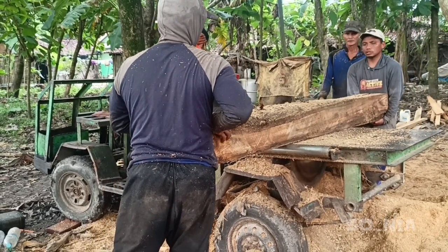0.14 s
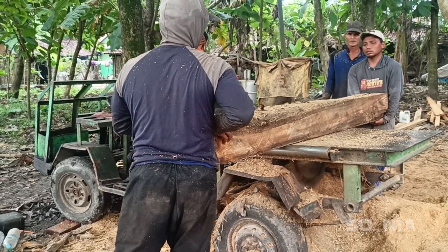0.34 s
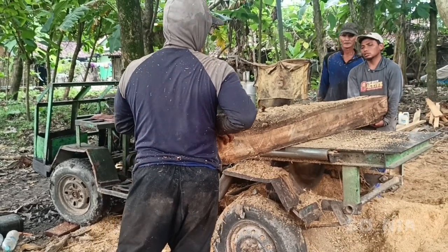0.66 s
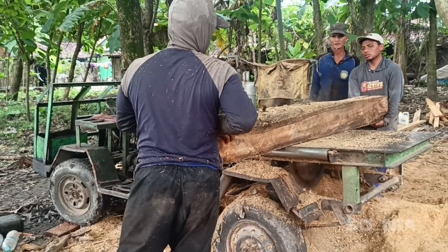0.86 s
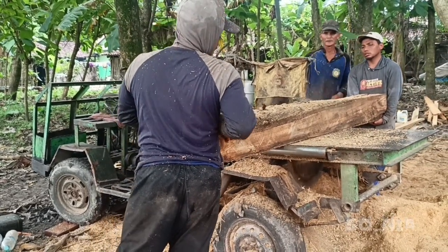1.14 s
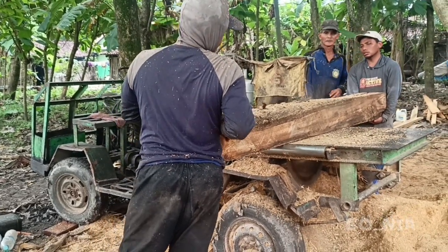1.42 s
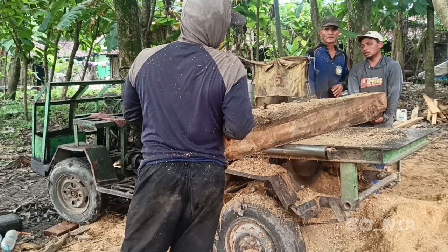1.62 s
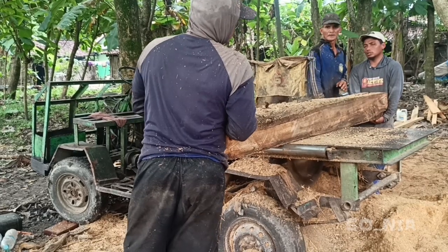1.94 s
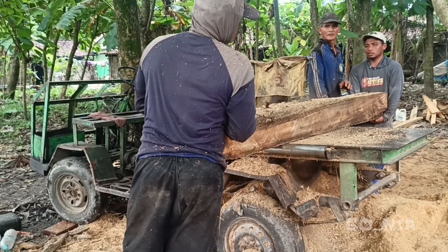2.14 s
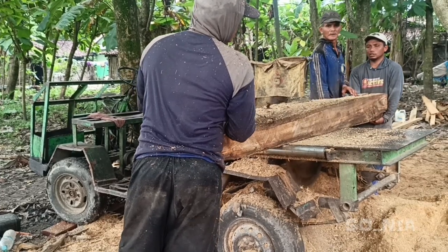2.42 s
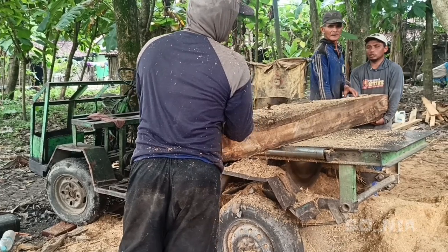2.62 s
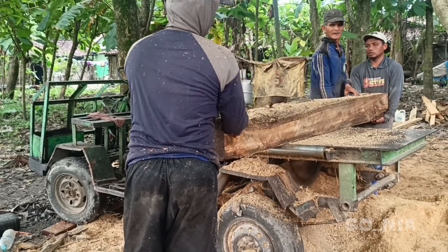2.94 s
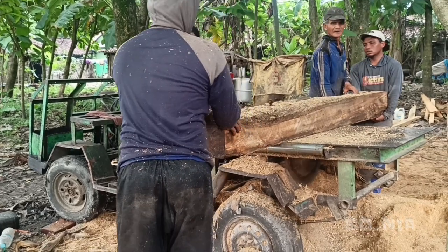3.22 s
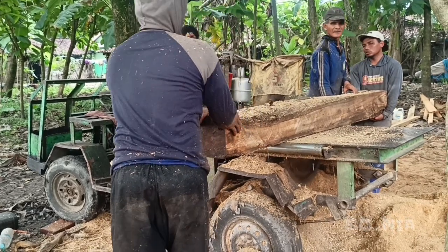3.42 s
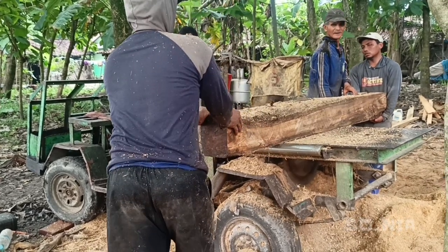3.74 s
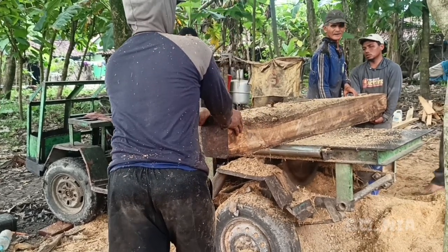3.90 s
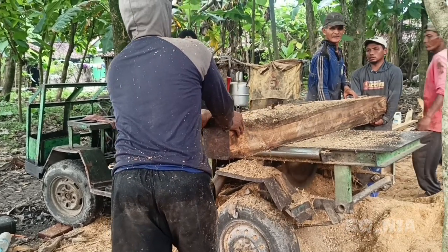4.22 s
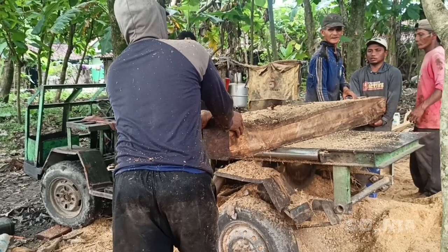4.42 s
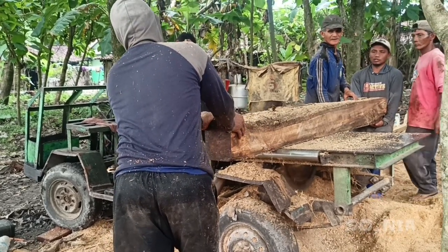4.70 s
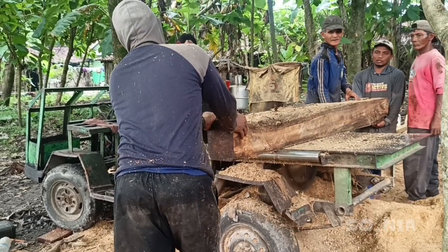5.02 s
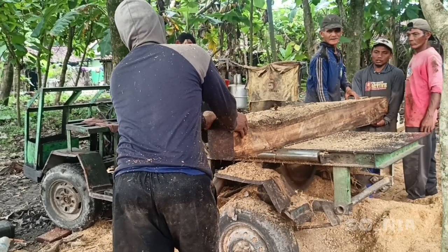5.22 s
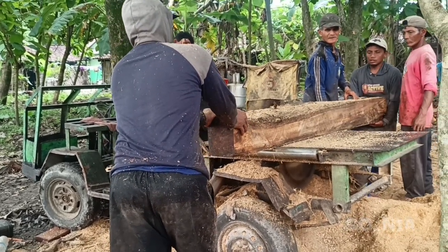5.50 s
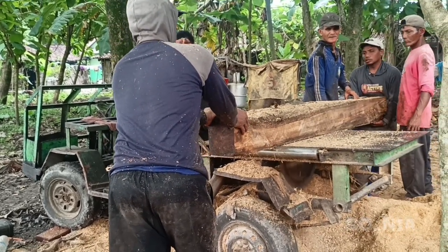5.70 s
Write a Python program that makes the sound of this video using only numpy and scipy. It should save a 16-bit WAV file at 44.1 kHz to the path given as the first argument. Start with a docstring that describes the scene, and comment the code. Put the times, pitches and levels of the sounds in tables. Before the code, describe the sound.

A circular saw is already cutting a wooden beam outdoors, and it continues for the whole six seconds or so. Its high, ringing hiss swells about eight times a second as the blade rubs in the cut. Underneath, a one-cylinder diesel engine fires nine or ten times a second, with soft puffs, hard knocks and a sheet-metal rattle over the steady noise of belt and fan. The hiss grows louder as the beam is pushed, from about 0.1 to 0.8 seconds, more gently from 1.3 to 3, and again from 3.3 to 5.4. Short, sharper bursts mark the teeth catching hard grain, in the first second and several times after 3.5 seconds. The blade sings a brief high note at about 4.5 seconds and a fainter one at 5.5. The engine knocks harder at the very start and just before the end.

```python
"""Outdoors, a one-cylinder diesel on a home-built cart drives a circular saw through a wooden beam.
The teeth tear the wood with a hiss that rings in the blade. The hiss swells about eight times a second
as the blade rubs in the cut, and grows louder when the beam is pushed. Twice the blade sings briefly.
Underneath, each engine cycle brings soft puffs of air and a hard combustion knock with a rattle after it,
over the running noise of belt, fan and cart."""
import sys
import numpy as np
from scipy.fft import rfft, irfft, next_fast_len
from scipy.io import wavfile
from scipy.ndimage import map_coordinates

SR = 44100
rng = np.random.default_rng(int(sys.argv[2]) if len(sys.argv) > 2 else 0)


def store_wav(level_fs):
    """Save 16-bit WAV to argv[1]."""
    pcm = np.round(np.clip(np.atleast_2d(level_fs), -1, 1) * 32767)
    wavfile.write(sys.argv[1], SR, pcm.T.astype(np.int16))


N = 258426

# How fast the blade rubs in the cut. Each row: time in seconds, swells per second.
RUB_PACE = [(0.0, 9.009), (0.67, 8.094), (1.47, 7.82), (2.14, 8.336), (3.1, 7.697), (3.42, 8.631),
            (3.57, 7.655), (5.58, 7.771), (5.86, 9.2)]
# The shape of one swell. Each row: how far through it from 0 to 1, contact with the wood from 0 to 1.
RUB_SHAPE = [(0, 0.06), (.16, 0.01), (.25, 0.6), (.36, 0.99), (.56, 0.82), (.77, 0.82), (.87, 0.55),
             (1, 0.04)]
# The broad tone of the hiss. Each row: frequency in Hz, relative level in dB.
HISS_TONE = [(400, -12.5), (2000, -19), (2950, -19), (3300, -10), (4200, -5.5), (4550, -10.5),
             (5600, -11.5), (6150, -3), (7600, -2.5), (8400, -11.5), (9400, -13.5), (11000, -22),
             (12800, -21.5), (15400, -16)]
# Where the blade rings. Each row: frequency in Hz, width in Hz, boost in dB (a dip if negative).
BLADE_RINGS = [(3190, 82, 2.5), (3370, 49, 4), (3610, 150, -3), (4330, 460, 0.5), (4900, 97, 6),
               (5220, 160, 8), (6330, 150, 4), (6550, 93, -13), (6710, 100, 4.5), (7240, 160, 3.5),
               (7730, 84, -2.5), (8300, 55, -2), (10650, 160, 1)]
# The beam is pushed into the blade. Each row: start in seconds, length in seconds, boost in dB.
BEAM_PUSHES = [(0.133, .42, 3.5), (0.475, 0.31, 2.5), (1.314, 1.75, 1.73), (3.27, 0.32, 3.5),
               (3.593, 1.83, 2)]
# The teeth catch on hard grain. Each row: start in seconds, boost in dB.
GRAIN_CATCHES = [(.192, 4), (.499, 2.5), (.625, 5), (3.495, 4.5), (4.376, 4.5), (5.029, 3.5), (5.29, 2.5)]
# The blade sings. Each row: loudest moment in seconds, pitch in Hz, level in dB.
BLADE_NOTES = [(4.47, 4280, -24.5), (5.47, 4230, -28)]

# The engine's speed. Each row: time in seconds, firings per second.
ENGINE_SPEED = [(0.0, 10.1), (0.75, 9.439), (1.98, 9.587), (2.78, 9.466), (3.38, 9.58), (4.19, 9.353),
                (4.9, 9.51), (5.42, 9.369), (5.86, 9.88)]
# The engine works harder. Each row: start and length in seconds, then puff and knock boosts in dB.
ENGINE_SURGES = [(-.07, 0.36, 5.5, 6), (1.3, 0.84, 1.3, 3), (3.025, 0.46, 2, 2), (4.2, 1.17, 2.1, 0.9),
                 (5.637, 0.17, 4, 8)]
# Air pushed by intake, exhaust and panels. Each row: point in the cycle from 0 to 1, pitch in Hz,
# half length in seconds, relative level in dB.
AIR_PUFFS = [(0.103, 199, 0.0026, -1), (0.17, 182, 0.004, -8), (0.223, 130, 0.0035, -14.5),
             (0.496, 193, 0.0022, -4.5), (0.592, 82.6, 0.0062, -5.5), (0.729, 70, 0.0082, -17),
             (0.833, 235, 0.004, -6.5), (0.895, 120, 0.0037, -8.5)]
# The combustion knock, then piston and valve gear. Each row: point in the cycle from 0 to 1,
# seconds to fade by 60 dB, relative level in dB.
ENGINE_KNOCKS = [(.256, 0.011, -7.5), (.275, 0.028, -4.5), (.325, 0.02, -7.5), (.365, 0.05, -9.5),
                 (.452, 0.037, -8.5), (.54, 0.075, -10), (.68, 0.074, -13), (0.869, 0.08, -17)]
# The broad tone of a knock. Each row: frequency in Hz, relative level in dB.
KNOCK_TONE = [(150, -22.5), (400, -8), (560, -6.5), (720, 0), (930, 2), (1060, -8.5), (1450, -3.5),
              (2000, -20.5), (2550, -7), (3000, -12.5), (6000, -29), (12000, -45)]
# Where the engine block and the cart's sheet metal ring. Each row: frequency and width in Hz, boost in dB.
FRAME_RINGS = [(169, 15, 5.5), (281, 24, 6), (460.5, 31, 6.5), (550, 70, -1), (650, 21, 6.5),
               (687, 46, 4.5), (788, 14, 6.5), (809, 15, -6), (850, 20, 5), (910, 63, 0.5), (1270, 38, 8),
               (1406, 60, 3.5), (1770, 120, 5), (2502, 230, 6)]
# The broad tone of belt, fan and cart. Each row: frequency in Hz, relative level in dB.
RUNNING_TONE = [(25, -25), (45, -11), (65, -9.5), (120, -0.5), (280, 0.5), (400, -1), (540, -5.5),
                (740, -4), (1060, -8.5), (1420, -4), (2150, -11.5), (2500, -8), (3000, -11.5),
                (9000, -21.5)]

HISS_DB, PUFF_DB, KNOCK_DB, RUNNING_DB = -20, -30, -33, -29.5  # base levels, before any boost
PRESS_S, EASE_S = 0.16, 0.18  # seconds for pressure on the blade to build and to ease


def saw(chip_rate, chip_db, flutter_db, dulling_db):
    """Teeth tear wood fibres in many tiny snaps; harder contact is louder and brighter."""
    contact, swell = rubbing(flutter_db)
    chips = (rng.random(N) < chip_rate / SR) * rng.standard_normal(N)
    hiss = coloured(rng.standard_normal(N) + amp(chip_db) * unit(chips), HISS_TONE, BLADE_RINGS)
    above = lambda edge_hz: filtered(hiss, lambda hz: 1 / (1 + (edge_hz / (hz + 1)) ** 8))
    treble, dust = above(5500), above(8800)
    blade_ring = treble - dust
    boost_db = pushes() + catches()
    swing_db = boost_db - boost_db.mean()
    # the wood's rasp follows contact and pushing less than the blade's ring does
    rasp = (hiss - treble) * amp(-dulling_db * contact - 0.34 * swing_db + 0.86 * wobble(60))
    # the spray of sawdust grows fastest with a push, lingers between swells and flutters on its own
    spray = dust * amp(0.33 * swing_db - 0.9 * contact + 1.6 * wobble(60))
    return amp(HISS_DB + boost_db) * swell * (rasp + blade_ring + spray)


def rubbing(flutter_db):
    """The blade rubs in the cut. Gives the contact around its average, and the swell in loudness."""
    swell_count = np.cumsum(curve(RUB_PACE)) / SR
    contact = np.interp(swell_count % 1, *np.transpose(RUB_SHAPE))
    contact -= contact.mean()
    # while the blade is deep in the wood, the hiss sinks further between swells
    depth_db = 3 + 5.5 * rise_and_fall(start=0.1, length=5.42, rise=PRESS_S, fall=EASE_S)
    # the grain of the wood makes every swell a little different
    grain_db = 0.45 * wobble(22) + flutter_db * wobble(90)
    return contact, unit(amp(depth_db * contact + grain_db))


def pushes():
    """The boost in dB from pushing the beam; where pushes overlap, the stronger one counts."""
    boosts = [db * rise_and_fall(start, length, PRESS_S, EASE_S) for start, length, db in BEAM_PUSHES]
    return np.max(boosts, axis=0)


def catches(fade_s=0.016):
    """The sudden, short boost in dB as the teeth tear through hard grain."""
    t = clock()
    return sum(db * (t > start) * np.exp(-((t - start) / fade_s) ** 2) for start, db in GRAIN_CATCHES)


def singing(half_length_s, width_hz):
    """Rubbing briefly sets the blade ringing at one pitch."""
    out = np.zeros(N)
    for peak_s, pitch_hz, db in BLADE_NOTES:
        ring = filtered(rng.standard_normal(N), lambda hz: 1 / (1 + (2 * (hz - pitch_hz) / width_hz) ** 2))
        out += amp(db) * np.exp(-((clock() - peak_s) / half_length_s) ** 2) * unit(ring)
    return out


def engine():
    """Puffs, knocks and running noise all grow louder when the diesel works harder."""
    puff_boost, knock_boost = sum(np.outer(boosts, rise_and_fall(start, length, rise=0.22, fall=0.45))
                                  for start, length, *boosts in ENGINE_SURGES)
    air = amp(PUFF_DB + puff_boost) * puffs(scatter_db=0.5, jitter_s=0.00029, pitch_scatter=0.045)
    blows = amp(KNOCK_DB + knock_boost) * knocks(scatter_db=0.5, strike_gain=7.2)
    whirr = amp(RUNNING_DB + 0.6 * puff_boost + 0.16 * knock_boost) * running_noise()
    return air + blows + whirr


def puffs(scatter_db, jitter_s, pitch_scatter):
    """Each puff is a short push of air followed by a suck, never twice the same."""
    out, span = np.zeros(N), np.arange(-SR // 32, SR // 32)
    for point, hz, half_length, db in AIR_PUFFS:
        times = cycle_times(point)[:, None]
        chance = rng.standard_normal((64, 3))[:len(times)]  # three random numbers for each puff
        size, late, pitch = chance.T[:, :, None]
        index = (times * SR).astype(int) + span
        t = index / SR - times - jitter_s * late
        wave = -np.sin(2 * np.pi * hz * (1 + pitch_scatter * pitch) * t)
        puff = amp(db - scatter_db * size) * wave * np.exp(-(t / half_length) ** 2)
        inside = (index >= 0) & (index < N)
        out += np.bincount(index[inside], puff[inside], N)
    return unit(out)


def knocks(scatter_db, strike_gain):
    """Each knock is one hard strike and a dying rattle; both make the engine block ring."""
    rattle_power, strikes = np.zeros(N), np.zeros(N)
    for point, fade_s, db in ENGINE_KNOCKS:
        times = np.r_[-1, cycle_times(point)]
        latest = np.searchsorted(times, clock(), side="right") - 1
        size = amp(db + scatter_db * rng.standard_normal(64))[latest]
        age = clock() - times[latest]
        rattle_power += (size * amp(-60 * age / fade_s)) ** 2
        strikes += np.diff(latest, prepend=latest[0]) * size  # one click as each knock begins
    rattle = np.sqrt(rattle_power) * rng.standard_normal(N)
    return coloured(strike_gain * strikes + rattle, KNOCK_TONE, FRAME_RINGS)


def cycle_times(point):
    """The times in seconds at which the engine passes a given point of its cycle."""
    cycles = 0.4715 + np.cumsum(curve(ENGINE_SPEED)) / SR  # starts partway through a cycle
    passes = np.arange(np.ceil(cycles[0] - point), cycles[-1] - point) + point
    return np.interp(passes, cycles, clock())


def running_noise():
    """Belt, fan and cart make a steady noise that rings in the block and the sheet metal."""
    return coloured(rng.standard_normal(N), RUNNING_TONE, FRAME_RINGS)


def coloured(x, tone, rings):
    """Gives x the broad tone and the ringing of a solid body, at an average strength of 1."""
    m = 2 * next_fast_len(N // 2 + SR // 4)
    hz = np.fft.rfftfreq(m, 1 / SR)
    tone_hz, tone_db = np.transpose(tone)
    db = np.interp(np.log(hz + 1), np.log(tone_hz + 1), tone_db)
    db += sum(boost / (1 + (2 * (hz - centre) / width) ** 2) for centre, width, boost in rings)
    # keeping only the first half makes the body ring after a strike, never before it
    cepstrum = irfft(np.log(amp(db)))[:m // 2]
    response = np.exp(rfft(2 * cepstrum, m))
    return unit(irfft(rfft(x, m) * response)[:N])


def filtered(x, response):
    """Turns each frequency in x up or down by response(hz)."""
    m = next_fast_len(N + SR // 2)
    return irfft(rfft(x, m) * response(np.fft.rfftfreq(m, 1 / SR)), m)[:N]


def rise_and_fall(start, length, rise, fall):
    """Climbs from 0 to 1, holds, and drops back once its length is over; all times in seconds."""
    end = start + length
    return np.interp(clock(), [start, start + min(rise, length), end, end + fall], [0, 1, 1, 0])


def wobble(rate):
    """A smooth curve through random values, rate of them a second."""
    return map_coordinates(rng.standard_normal(int(N * rate / SR) + 4), [clock() * rate])


def curve(rows):
    """Joins rows of time and value with straight lines, one value per sample."""
    return np.interp(clock(), *np.transpose(rows))


def clock():
    """The time of each sample in seconds."""
    return np.arange(N) / SR


def amp(db):
    """Turns decibels into a number to multiply by."""
    return 10 ** (np.asarray(db) / 20)


def unit(x):
    """Scales x to an average strength (rms) of 1."""
    return x / np.sqrt(np.mean(x ** 2) + 1e-20)


def scene():
    """Engine and saw together, the same in both ears."""
    mono = engine()
    mono += saw(chip_rate=3000, chip_db=-6, flutter_db=1.07, dulling_db=5.0)
    mono += singing(half_length_s=0.032, width_hz=87)
    return np.array([mono, mono])


def record(dry):
    """Takes away the deepest bass and the very highest treble."""
    low_cut_hz, top_hz = 42, 15480
    band = lambda hz: (hz < top_hz) / (1 + (low_cut_hz / (hz + 1)) ** 6)
    return np.array([filtered(x, band) for x in dry])


dry = scene()
out = record(dry)
store_wav(out)
```